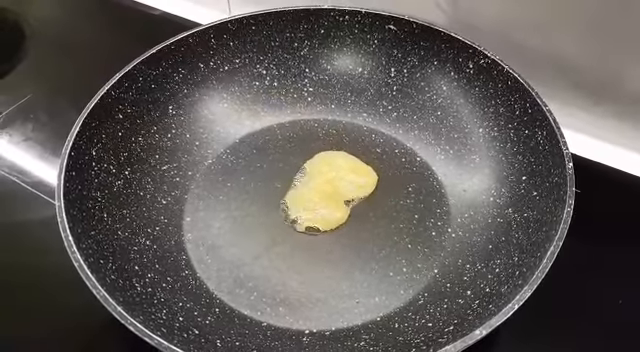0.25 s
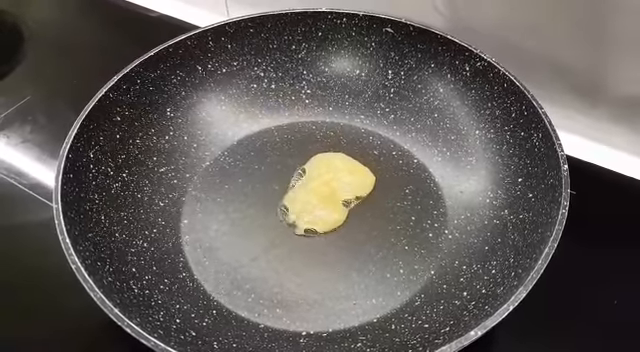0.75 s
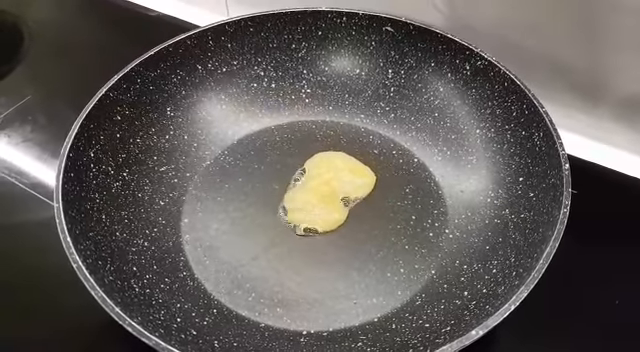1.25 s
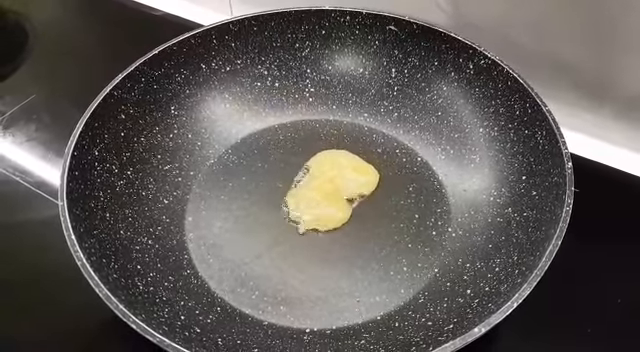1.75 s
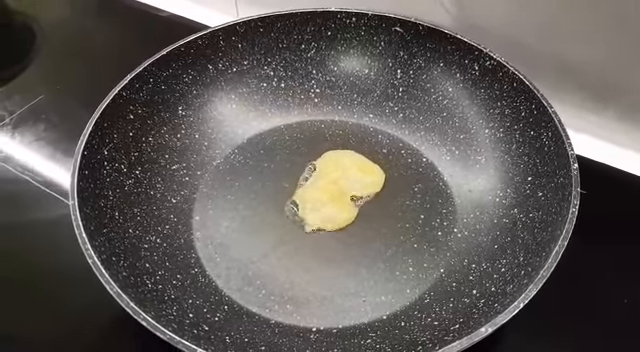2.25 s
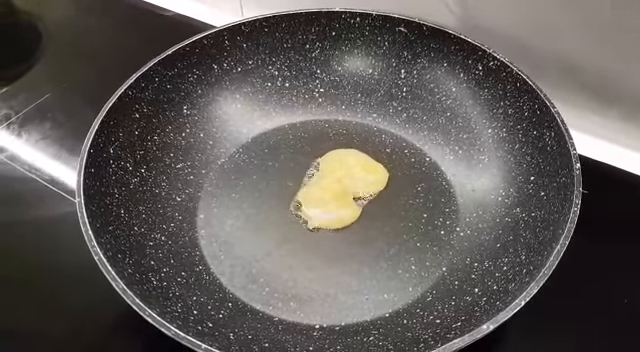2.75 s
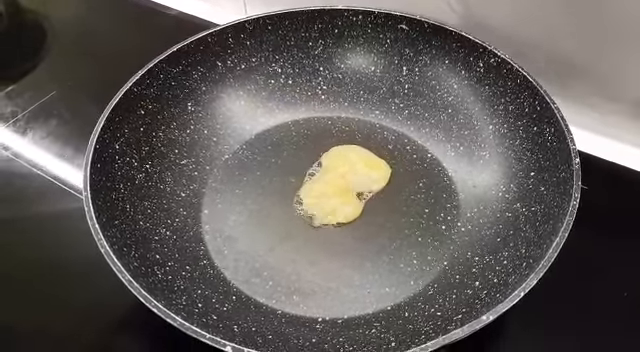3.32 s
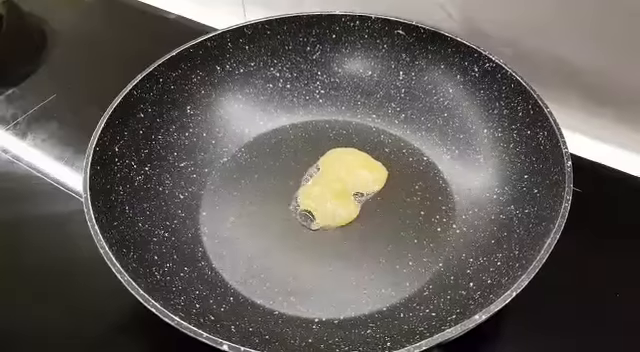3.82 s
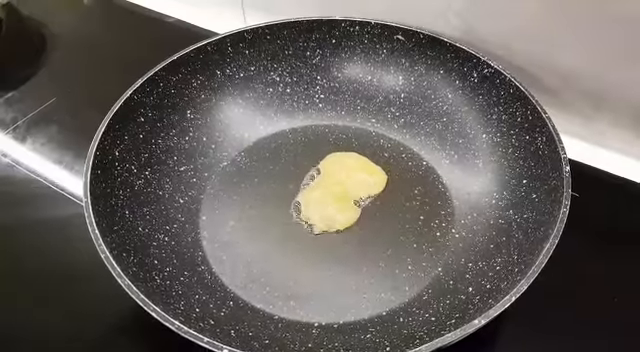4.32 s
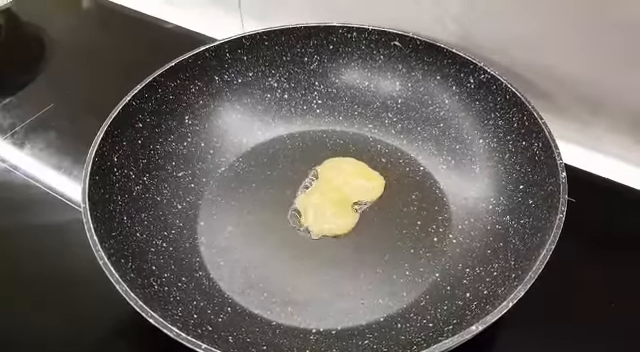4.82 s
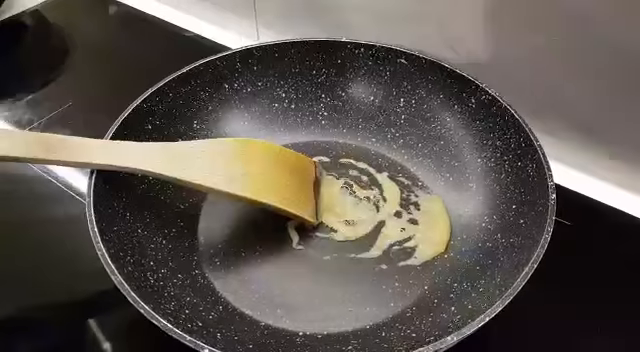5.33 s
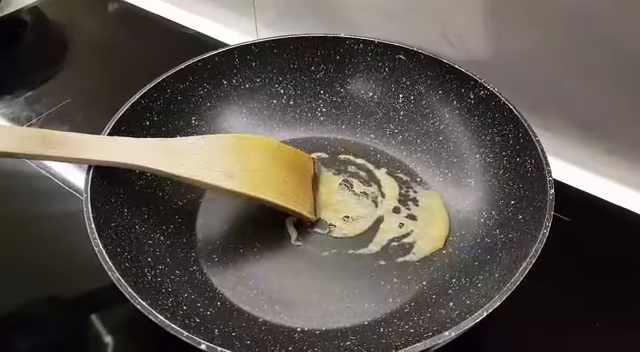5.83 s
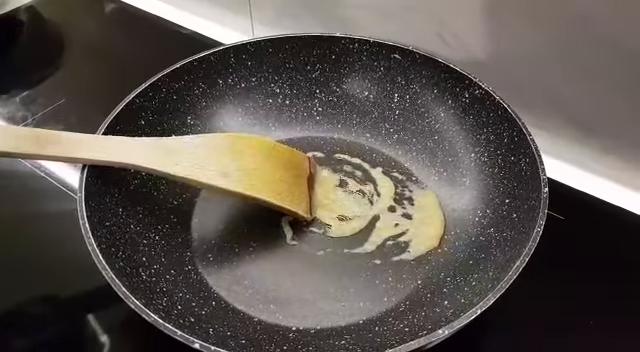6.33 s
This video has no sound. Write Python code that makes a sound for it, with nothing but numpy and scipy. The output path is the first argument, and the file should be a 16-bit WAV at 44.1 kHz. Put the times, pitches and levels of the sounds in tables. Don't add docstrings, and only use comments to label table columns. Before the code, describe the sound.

Throughout about 6.5 seconds, butter sizzles softly in a hot pan at arm's length: a dense, bright, wide hiss of tiny bursting bubbles with small quick surges. Beneath it an extractor fan rushes and rumbles, with a steady low hum near 100 Hz. At 0.62 s a cupboard door knocks shut further off, woody and dull, rattling lightly until about 0.8 s. At 0.9 s a steel lid clangs with several rapid bounces, its ring fading quickly in the tiled room. The hiss and hum drop slightly with the clang and return between 3.2 and 3.8 s, when the sizzle grows more fluttery. Soft low handling bumps and rubs come around 4.05-4.3 s and 4.8 s; small creaks on the right from 4.95 s, with a sharp snap at 5.1 s. From 5.2 s the phone is nearer: hum slightly stronger, fan rush weaker, sizzle steady to the end.

```python
import sys
import numpy as np
from scipy import signal
from scipy.fft import rfft, irfft, next_fast_len
from scipy.io import wavfile
from scipy.ndimage import uniform_filter1d

SR = 44100
rng = np.random.default_rng(int(sys.argv[2]) if len(sys.argv) > 2 else 0)


def convert_level_to_amplitude(level_db):
    exponent = np.asarray(level_db, float) / 20
    return 10 ** exponent


def digitize_waveform(pressure):
    field = np.atleast_2d(pressure).T
    bounded = np.clip(field, -1, 1)
    quanta = np.round(bounded * 32767).astype(np.int16)
    wavfile.write(sys.argv[1], SR, quanta)


N = 289600
TIME = np.arange(N) / SR
NEARER_S = 5.22


def colour(x, points, causal=False):
    size = 2 * next_fast_len(x.shape[-1] // 2 + 1)
    hz, db = np.transpose(points)
    bins_hz = np.arange(size // 2 + 1) * SR / size
    gain = convert_level_to_amplitude(np.interp(np.log(bins_hz + 1), np.log(hz), db))
    if causal:
        cepstrum = irfft(np.log(gain), size)
        cepstrum[1:size // 2] *= 2
        cepstrum[size // 2 + 1:] = 0
        gain = np.exp(rfft(cepstrum))
    return irfft(rfft(x, size) * gain, size)[..., :x.shape[-1]]


def band_rms(x, lo_hz, hi_hz):
    power = np.abs(rfft(x.mean(0))) ** 2
    return np.sqrt(2 * power[int(lo_hz * N / SR):int(hi_hz * N / SR)].sum()) / N


def walk(rate_hz):
    hold = int(SR / rate_hz)
    steps = np.repeat(rng.standard_normal(N // hold + 1), hold)
    return 1.4 * uniform_filter1d(uniform_filter1d(steps, hold), hold)[:N]


def ramp(start_s, length_s):
    return np.clip((TIME - start_s) / length_s, 0, 1)


# pitch_hz, shared [0-1]
LIKENESS = [(60, 1), (130, 0.97), (300, 0.47), (700, 0.3), (1500, 0.28), (3000, 0), (16000, 0)]


def two_ports(mid, side):
    hz, like = np.transpose(LIKENESS)
    like = np.clip(like, 0, .999)
    mid = colour(mid, np.c_[hz, 10 * np.log10(1 + like)])
    side = colour(side, np.c_[hz, 10 * np.log10(1 - like)])
    return np.array([mid + side, mid - side])


def grains(per_s, spread_db, swell):
    chance = rng.random((2, N))
    size = convert_level_to_amplitude(spread_db * rng.exponential(size=(2, N))) * rng.standard_normal((2, N))
    clicks = size * (chance < per_s * swell / SR)
    return two_ports(*clicks)


# pitch_hz, level_db [dB per Hz]
FAT = [(1530, -21), (2600, -4), (2870, -2), (3120, -1), (3380, -4.5), (3720, 0), (5400, -3), (5880, -9.5),
       (7500, -9.5), (9750, -8), (16500, -120)]
# pitch_hz, level_db [dB per Hz]
SPATTER = [(3530, -20.5), (6000, -1.5), (6800, -5), (7050, -2.5), (7830, -4.5), (9730, -3), (10500, -1),
           (11400, 0.5), (12800, -2), (14000, -4), (15700, -6)]


def sizzle(fat_db, spatter_db):
    boil = convert_level_to_amplitude(0.69 * walk(14))
    fat = colour(grains(20000, 0.55, boil), FAT)
    spatter = colour(grains(22000, 0.57, boil * convert_level_to_amplitude(0.65 * walk(25))), SPATTER)
    fat *= convert_level_to_amplitude(fat_db) / band_rms(fat, 2830, 6100)
    spatter *= convert_level_to_amplitude(spatter_db) / band_rms(spatter, 7300, 15300)
    return fat + spatter


# start_s (of the crest), length_s, swell_db, brightness [0-1]
FLURRIES = [(.45, 0.039, 3.5, .95), (1.6, .3, 1.8, 1), (1.753, .025, 4, .95), (1.894, 0.026, 3.5, 1),
            (2, 0.023, 2.5, .9), (2.687, 0.027, 2.5, .9), (3.06, 0.11, -2, 1), (3.287, .15, 3, 0.8),
            (3.423, 0.057, 4, 0.1), (3.597, 0.02, 4.5, 0.5), (3.673, .04, 4, 0), (4.015, 0.041, 0, 0.5),
            (4.288, 0.094, 5.5, .7), (4.58, 0.018, 4.5, 0.2), (4.698, 0.045, -4, 1), (4.757, .025, 2.5, 1),
            (4.93, 0.09, 1.5, 0.4), (5.097, 0.43, -2.5, 0.9), (5.147, .06, 3, 0)]


def flurries():
    out = np.zeros((2, N))
    for s, length_s, db, bright in FLURRIES:
        share = np.clip([[2 - 2 * bright], [2 * bright]], 0, 1)
        out += db * share * np.exp(-.5 * ((TIME - s) / (length_s / 2.5)) ** 2)
    return out


# pitch_hz, width_hz, level_db
PAN = [(1153, 17, 0), (2077, 15, 3.5), (2500, 37, 1), (3840, 440, -4), (4370, 75, -0.5), (5490, 25, 2),
       (8500, 88, -0.5), (11800, 280, -5.5), (13600, 69, 0.5)]


def pan_rings(x, lift_db=5.0):
    hz = np.arange(N // 2 + 1) * SR / N
    lift = sum((lift_db + db) / (1 + (2 * (hz - f) / width) ** 2) for f, width, db in PAN)
    return irfft(rfft(x) * convert_level_to_amplitude(lift - 1.16), N)


# pitch_hz, level_db [left minus right]
LEAN = [(60, 0), (110, -16.5), (200, -8), (380, 1.5), (700, 3.5), (1290, -0.5), (2380, -2.5), (4400, -2),
        (8120, 1.0), (15000, 4.5)]


def lean(hiss):
    hz, db = np.transpose(LEAN)
    left = colour(hiss[0], np.c_[hz, db / 2])
    right = colour(hiss[1], np.c_[hz, -db / 2])
    return np.array([left, right])


def pool(hiss, near):
    centre_hz, width_hz = 3700, 230
    edges_hz = [centre_hz - width_hz / 2, centre_hz + width_hz / 2]
    band = signal.butter(1, edges_hz, "band", fs=SR, output="sos")
    growth = convert_level_to_amplitude(-4 + 4.1 * walk(11)) * ramp(3.3, .3) * (1 - near)
    return hiss + signal.sosfilt(band, hiss) * growth


def ring(x, modes):
    flutter_s, flutter_depth = .009, 0.6
    out, t = 0, np.arange(len(x)) / SR
    knots_s = flutter_s * np.arange(300)
    for (hz, db, t60_s), chance in zip(modes, rng.uniform(-0.814, 1, len(modes))):
        pole = np.exp(2j * np.pi * hz / SR - np.log(1000) / (t60_s * SR))
        port_phase = np.sign(chance) * min(hz / 450, .68) * np.array([[1], [-1]])
        a, b = (np.interp(t, knots_s, v) for v in rng.standard_normal((2, len(knots_s))))
        waver = 1 + flutter_depth * min(hz / 900, 1) * (a + 1j * b)
        mode = signal.lfilter([1], [1, -pole], x)
        out = out + convert_level_to_amplitude(db) * (np.exp(1j * port_phase) * waver * mode).imag
    return out


# pitch_hz, level_db
TAIL = [(60, -1), (300, -1), (900, 1), (2000, -3.5), (5000, -2), (16000, -5)]


def kitchen(dry):
    early_db, early_t60_s = 2, 0.067
    late_db, late_t60_s = -13, 0.5
    t = np.arange(SR // 2) / SR
    early, late = (two_ports(*rng.standard_normal((2, len(t)))) for _ in range(2))
    echo = early * convert_level_to_amplitude(early_db - 60 * t / early_t60_s)
    echo += colour(late, TAIL) * convert_level_to_amplitude(late_db - 60 * t / late_t60_s)
    echo *= np.clip(t / 0.0016, 0, 1) / 30
    echo[0, 0], echo[1, 6] = .3, .3
    return signal.fftconvolve(dry[None], echo, axes=1)[:, :len(dry)]


def blows(table, modes, body, body_db, wet_db):
    push = np.zeros(SR * 2)
    for s, db in table:
        push[int(s * SR)] = convert_level_to_amplitude(db)
    decay = np.exp(-1 / (0.0036 * SR))
    crack = signal.lfilter([1], [1, -decay], push) * rng.standard_normal(len(push))
    rings = ring(push, modes)
    cracks = convert_level_to_amplitude(body_db) * colour(crack, body, causal=True)
    return rings + kitchen(convert_level_to_amplitude(wet_db) * rings[0] + cracks)


# start_s, level_db
KNOCKS = [
    (.6195, -12),
    (.623, -11.5),
    (.627, -14),
    (.632, -16.5),
    (.644, -32),
    (.652, -34),
    (.672, -29),
    (.695, -33),
]
# pitch_hz, level_db, t60_s
CUPBOARD = [(100, -8, 0.24), (220, -4.5, 0.059), (289, -5, 0.1), (457, -6, 0.11), (605, -15, 0.068),
            (814, -8.5, 0.13), (1160, -4, 0.045), (1310, -6, 0.044), (1620, -1.5, 0.083), (2260, -9, 0.045),
            (2320, -7.5, .04)]
# start_s, level_db
REBOUNDS = [
    (.718, -28),
    (.726, -25.5),
    (.745, -33.5),
    (.764, -36),
    (.88, -41.5),
]
# pitch_hz, level_db, t60_s
DOOR = [(294, -0.5, 0.047), (838, 2, 0.11), (1180, -4, 0.045), (1510, -15, 0.035), (2080, -23, .04)]
# pitch_hz, level_db [dB per Hz]
THUD = [(60, -22), (110, -1), (160, 4), (250, 0), (420, 7.5), (820, -0.5), (1400, -4), (2300, 1),
        (3000, -24), (4000, -26), (12000, -38), (16000, -72)]
# start_s, level_db
CLANGS = [
    (.904, -18.5),
    (.9065, -14),
    (.915, -15),
    (.927, -14.5),
    (.933, -19.5),
    (.940, -19.5),
    (.954, -24.5),
    (.979, -27.5),
]
# pitch_hz, level_db, t60_s
LID = [(100, -13.5, 0.088), (313, -17, 0.13), (635, -14, 0.09), (757, -11, 0.096), (849, -8, 0.16),
       (984, -29, 0.12), (1156, -13, 0.13), (1615, -31, 0.14), (1840, -32, .09), (1994, -11.5, 0.15),
       (2088, 0, 0.22), (2115, -2.5, 0.24), (2105, 2.5, 0.18), (2227, -4.5, 0.14), (3254, -9, 0.14),
       (3360, -7, 0.21), (3653, -6, 0.18), (3960, -10, 0.11), (4010, -11, 0.061), (4200, -25, 0.1),
       (4990, -20.5, 0.14), (5467, -10.5, 0.12), (5520, -14, 0.18), (5900, -25, 0.046), (7450, -15, 0.2),
       (9600, -19, 0.09), (10850, -14.5, 0.095), (12040, -24, .12), (12460, -19, .12), (13550, -26, 0.11)]
# pitch_hz, level_db [dB per Hz]
CRASH = [(220, -29), (520, -2), (1000, 3.5), (2070, -4), (2750, -10.5), (3700, -1), (4700, -10.5),
         (6200, -13), (6900, -24.5), (7500, -12), (8300, -24.5), (10000, -14.5), (13300, -13.5),
         (14200, -28)]
# start_s, level_db
DUCK = [
    (.945, 0),
    (1.0, -2.5),
    (1.3, 3.5),
]


def far_blows():
    sound = blows(KNOCKS, CUPBOARD, THUD, body_db=15, wet_db=-1)
    sound += blows(REBOUNDS, DOOR, THUD, body_db=6, wet_db=0.5)
    sound += blows(CLANGS, LID, CRASH, body_db=18, wet_db=-2)
    sound = signal.sosfilt(signal.butter(2, 75, "high", fs=SR, output="sos"), sound)
    out = np.zeros((2, N))
    out[:, :sound.shape[1]] = 0.35 * sound
    lean_db = -3 * np.array([[.5], [-.5]])
    return out * convert_level_to_amplitude(np.interp(TIME, *np.transpose(DUCK)) + lean_db)


# start_s, level_db [peak], pitch_hz, cycles
BUMPS = [(4.053, -38, 67.5, 0.9), (4.072, -34, 92, 2.46), (4.146, -28.5, 60, 2.4), (4.208, -35.5, 70, 2.7),
         (4.248, -43, 54, 1.8), (4.809, -35, 85.6, 2.2), (4.815, -50.5, 238, 9), (5.601, -53, 246, 5),
         (4.05, -54, 235, 4.8), (4.14, -51.5, 244, 7.5), (4.909, -41, 55.56, 1.5), (4.101, -39, 100, 2.2),
         (4.275, -40, 55, 1.8)]
# start_s, level_db [peak], sharpness_hz
TICKS = [
    (4.957, -31, 497),
    (4.996, -39, 700),
    (5.007, -35, 500),
    (5.033, -36, 450),
    (5.062, -37, 600),
    (5.089, -34.5, 500),
    (5.103, -40, 700),
    (5.112, -17, 3760),
    (5.118, -36, 500),
    (5.197, -37, 400),
]


def hand():
    out = np.zeros((2, N))
    for s, db, hz, cycles in BUMPS:
        t = np.arange(int(cycles / hz * SR)) / SR
        swell = np.sin(np.pi * t * hz / cycles) ** 0.85
        out[:, int(s * SR):int(s * SR) + len(t)] -= convert_level_to_amplitude(db) * np.sin(2 * np.pi * hz * t) * swell
    t = np.arange(800) / SR
    since = t - .001
    for s, db, hz in TICKS:
        snap = -np.exp(-.5 * (since * hz * 2 * np.pi) ** 2)
        rebound = 0.33 * (since > 0) * np.sin(2 * np.pi * 260 * since) * np.exp(-t / 0.0024)
        out[1, int(s * SR):int(s * SR) + len(t)] += convert_level_to_amplitude(db) * (snap + rebound)
    return out


RUSTLE_S = [3.665, 4.155, 4.82, 4.78, 5.03, 4.1]
# length_s, level_db, pitch_hz (centre)
RUSTLES = [
    (.09, -58, 790),
    (0.062, -56, 620),
    (.06, -56.5, 460),
    (0.028, -55, 840),
    (0.31, -65, 270),
    (0.17, -72, 210),
]


def rustle():
    out = np.zeros((2, N))
    for s, (length_s, db, hz) in zip(RUSTLE_S, RUSTLES):
        band = signal.butter(2, [hz * 0.66, hz * 1.66], "band", fs=SR, output="sos")
        swish = signal.sosfilt(band, rng.standard_normal((2, N)))
        envelope = np.exp(-.5 * ((TIME - s) / (length_s / 2.3)) ** 2)
        out += convert_level_to_amplitude(db) * swish / swish.std() * envelope
    return out


# pitch_hz, level_db [dB per Hz]
RUMBLE = [(12, -50), (27, -26), (45, -5.5), (70, -1.5), (125, -13.5), (205, -11.5), (260, -13.5),
          (346, -23.5), (580, -22.5), (900, -22.5), (1200, -79)]
# pitch_hz, level_db [dB per Hz]
AIR = [(410, -33), (700, -13), (1010, -12.5), (1140, -1), (1490, -5.5), (1710, -4), (1880, 2), (2180, -3),
       (2560, -0.5), (2870, -14), (3600, -4.5), (4680, -42), (7920, -120)]


def fan(rumble_db, air_db):
    rumble = colour(two_ports(*rng.standard_normal((2, N))), RUMBLE)
    air = colour(two_ports(*rng.standard_normal((2, N))), AIR)
    rumble *= convert_level_to_amplitude(rumble_db + 0.94 * walk(11)) / band_rms(rumble, 109, 370)
    air *= convert_level_to_amplitude(air_db + 0.16 * walk(15)) / band_rms(air, 1150, 2460)
    return rumble + air


# multiple, level_db [re mains line]
SHAFT = [
    (1, -9),
    (3, -26),
    (4, -17),
    (13, -23),
]
# pitch_hz, level_db [re mains line]
OTHER_LINES = [
    (154.9, -17),
    (300.3, -26),
]


def hum(hum_db):
    shaft_hz, mains_hz = 48.9, 100.1
    beat_hz, beat_crest_s, beat_db = 2.225, 2.306, -16
    lag = 4
    turn = 2 * np.pi * (shaft_hz * TIME + 0.031 * walk(2.6))
    motor = sum(convert_level_to_amplitude(db + 0.6 * walk(2.74)) * np.sin(k * turn + 1.6) for k, db in SHAFT)
    motor += sum(convert_level_to_amplitude(db + 1.0 * walk(3.3)) * np.sin(2 * np.pi * hz * TIME) for hz, db in OTHER_LINES)
    mains = 2 * np.pi * mains_hz * TIME + 1.68
    motor += convert_level_to_amplitude(beat_db) * np.sin(mains - 2 * np.pi * beat_hz * (TIME - beat_crest_s))
    lines = np.sin(mains) + motor * convert_level_to_amplitude(-3 * (TIME > NEARER_S))
    ports = np.array([lines, np.r_[lines[:lag], lines[:-lag]]])
    return np.sqrt(2) * ports * convert_level_to_amplitude(hum_db + np.array([[-1.5], [1.3]]))


def gain_control():
    pull_s, attack_s, hold_s, release_s = 0.84, 0.2, 2.15, 0.59
    pull_db, after_db = -4.5, -0.07
    release = ramp(pull_s + attack_s + hold_s, release_s)
    return pull_db * ramp(pull_s, attack_s) + (after_db - pull_db) * release


def scene():
    near = ramp(NEARER_S, 0.098)
    low_db, fine_db = flurries()
    air = fan(rumble_db=-62.5 - 1.5 * near, air_db=-55.5 - 3.5 * near)
    butter = sizzle(fat_db=-54.5 + 0.1 * near + low_db, spatter_db=-50.5 + 0.66 * near + fine_db)
    hiss = lean(pan_rings(air + butter))
    growth_db = -0.04 * (TIME - 2.15)
    steady = hum(-50 + 3.5 * near + growth_db) + pool(hiss, near)
    return steady * convert_level_to_amplitude(gain_control()) + far_blows() + hand() + rustle()


def top_cut(x):
    return signal.sosfilt(signal.butter(12, 16670, fs=SR, output="sos"), x)


def record(dry):
    low_pass = signal.ellip(12, .2, 70, 15740, fs=SR, output="sos")
    mix = signal.sosfilt(low_pass, dry)
    return top_cut(mix)


dry = scene()
out = record(dry)
digitize_waveform(out)
```